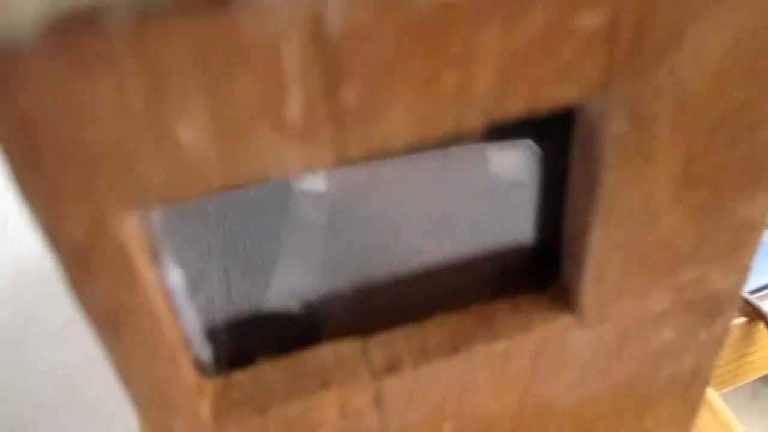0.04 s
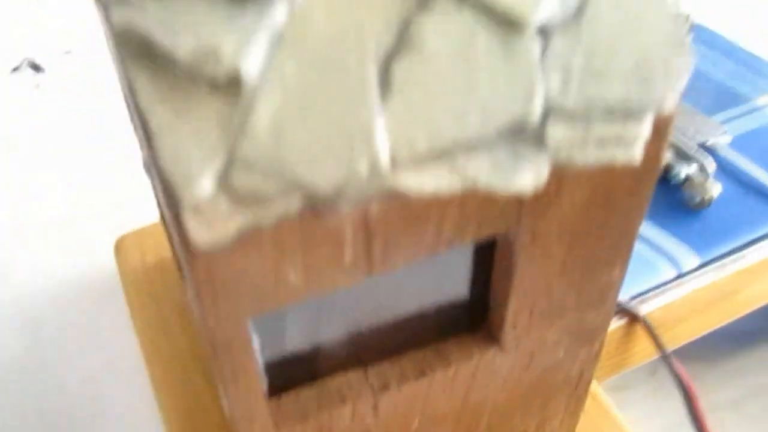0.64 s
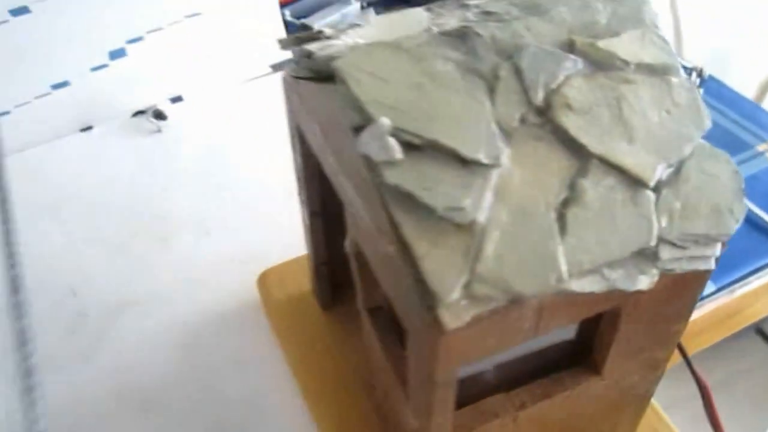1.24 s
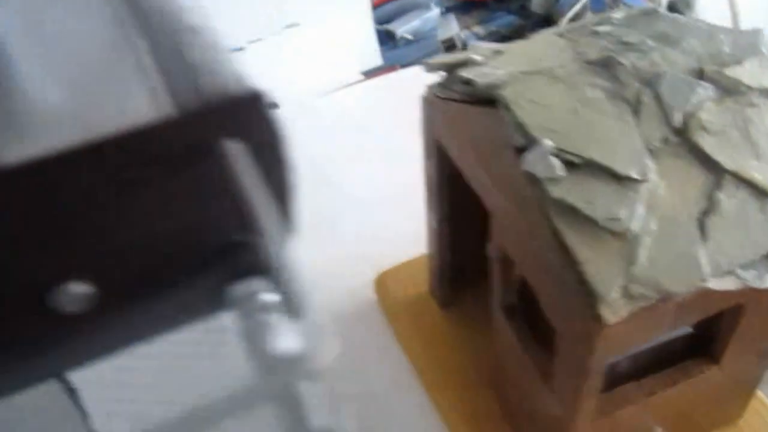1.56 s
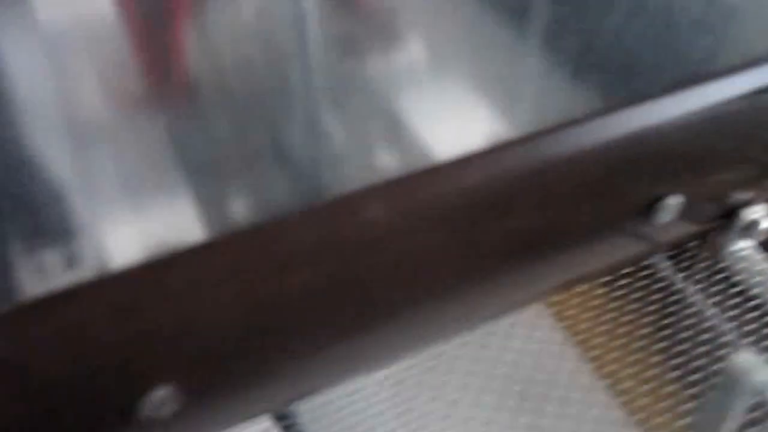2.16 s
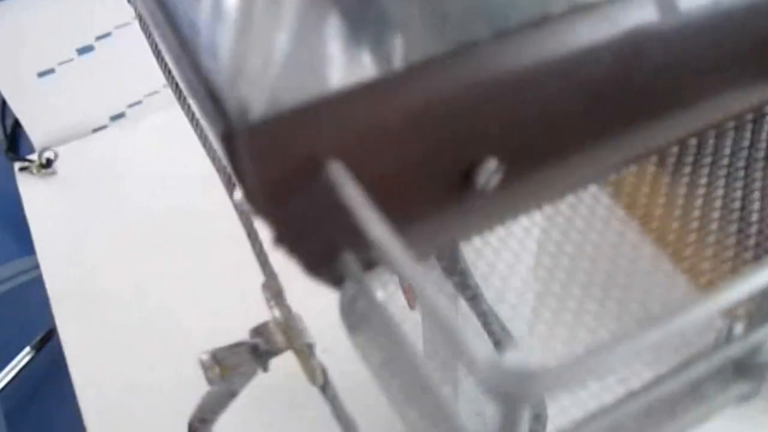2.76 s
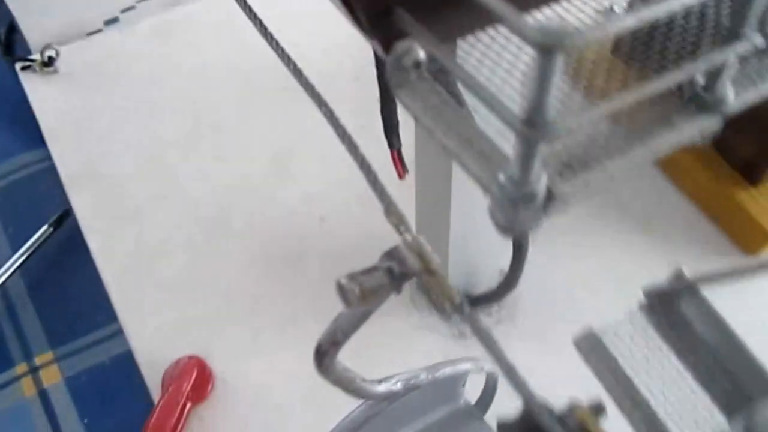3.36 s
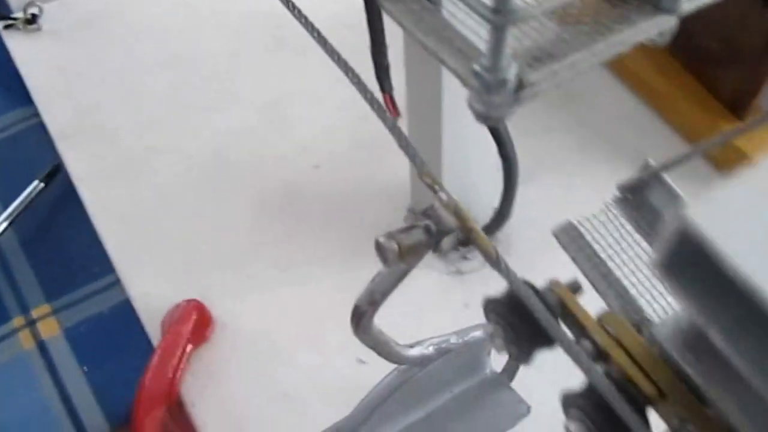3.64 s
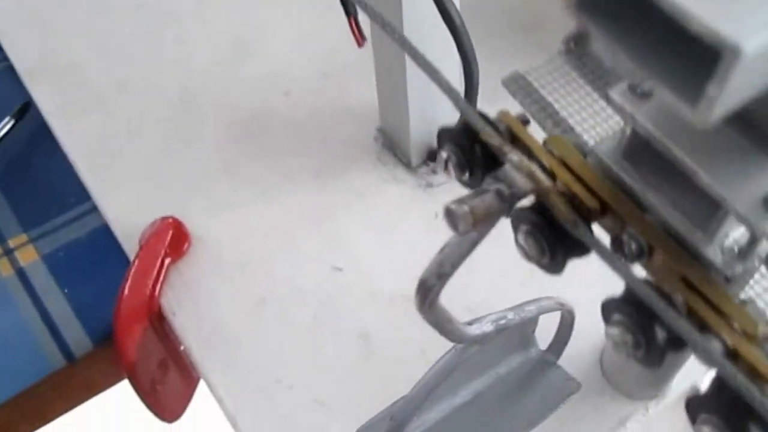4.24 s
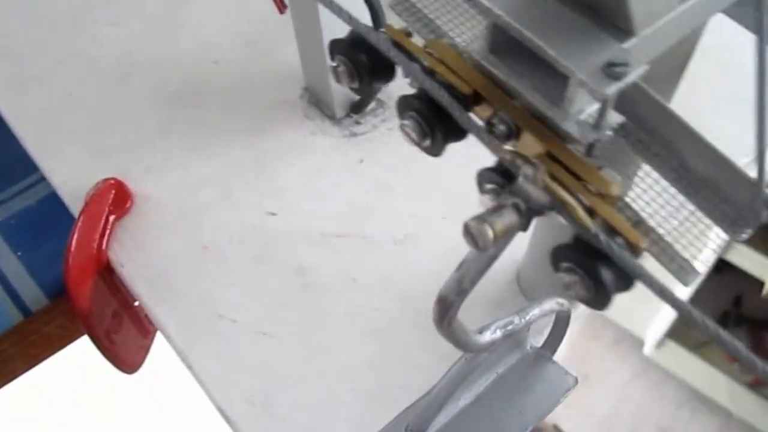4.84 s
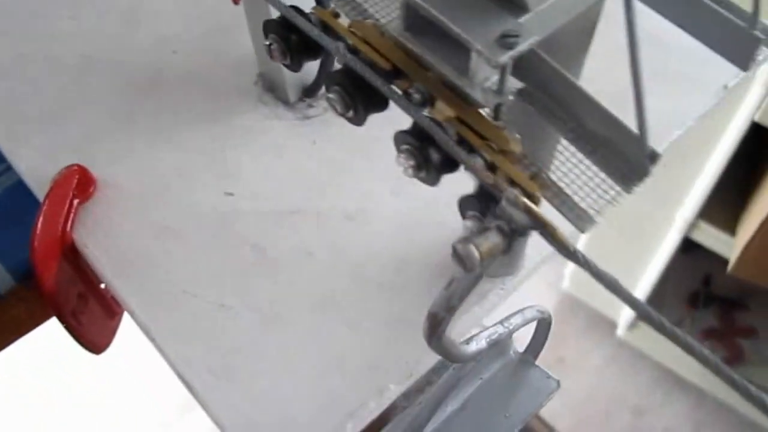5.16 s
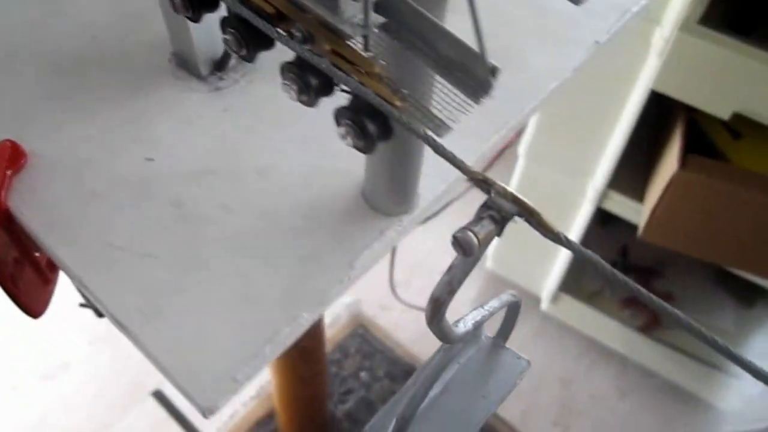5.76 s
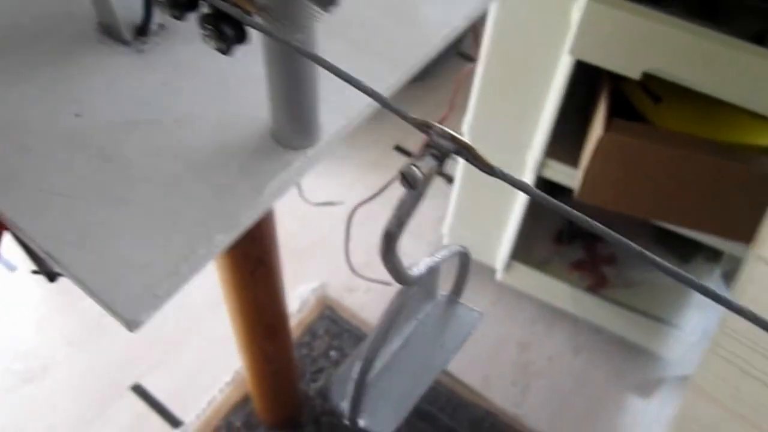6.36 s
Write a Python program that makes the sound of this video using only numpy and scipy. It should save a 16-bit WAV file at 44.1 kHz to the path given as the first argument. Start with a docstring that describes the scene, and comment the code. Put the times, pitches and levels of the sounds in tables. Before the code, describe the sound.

A small geared motor drives a model chairlift close by, whirring with a throbbing drone, a gear whine and a metallic rasp.

```python
"""At a table with a model chairlift, a hand-held microphone moving along it at close range.
A small geared motor drives the lift: its pinion turns a 50-tooth wheel whose worn teeth knock the
housing into a throbbing drone. The teeth whine and rasp, and a slower gear loads the drive four times
a second. Room rumble and mains hum lie underneath, with one soft bump about halfway through."""
import sys
import numpy as np
from scipy import signal
from scipy.fft import rfft, irfft
from scipy.io import wavfile
from scipy.ndimage import uniform_filter1d, map_coordinates

SR = 44100
rng = np.random.default_rng(int(sys.argv[2]) if len(sys.argv) > 2 else 0)


def output_pcm(signal):
    """Save a mono or channel-first signal as 16-bit PCM at the path in sys.argv[1].

    Samples are clipped to [-1, 1] before scaling.
    """
    pcm = np.clip(np.atleast_2d(signal).T, -1, 1) * 32767
    wavfile.write(sys.argv[1], SR, np.round(pcm).astype(np.int16))


N = 282681
T = np.arange(N) / SR
TEETH, PINION_TEETH = 50, 15
REDUCTION = 5  # wheel turns to one turn of the slow gear

# Room tone. Each row: frequency in Hz, relative level in dB.
RUMBLE_SPECTRUM = [(5, -18), (22, -5), (70, -3.5), (130, -2.5), (200, 2), (290, -3), (400, -5.5),
                   (900, -25), (4000, -45)]
# Hums of the mains and the drive. Each row: frequency in Hz, rms level in dB.
STEADY_HUMS = [(120, -56.5), (391.3, -51.5)]
# Pace of the wheel before the slow gear sways it. Each row: time in seconds, turns a second.
WHEEL_SPEED = [(0.0, 20.415), (1.1, 20.42), (2.0, 20.39), (2.35, 20.325), (3.1, 20.385), (4.9, 20.42),
               (6.41, 20.405)]
# Rings of the metal frame, each from its own part. Each row: frequency in Hz, width in Hz,
# boost from afar in dB, time in seconds when the microphone is nearest.
FRAME_RINGS = [(1790, 160, -4, 0.18), (2120, 41, -3, 0.2), (2410, 73, 3.5, 6.43), (2800, 150, 0, 1.1),
               (2910, 90, 0.5, 6.3), (3120, 120, 2, 0.82), (3480, 430, -2.5, 2.78), (4130, 140, 0, 1.52),
               (4600, 160, 0.5, 3.7), (5030, 72, -1.5, 3.7), (5360, 100, 2.5, 5.24),
               (5700, 380, -0.5, 2.22), (6200, 44, 3, 2.2), (6970, 140, 0, 0.3), (7160, 110, 2.5, 1.74),
               (7760, 160, 5, 4.13), (8260, 52, 7.5, 1.65), (9090, 170, 5.5, 2.44), (11120, 100, 4, 3.3),
               (14300, 200, 4.5, 2.7)]
# Basic colour of the rasp. Each row: frequency in Hz, relative level in dB.
RASP_SPECTRUM = [(250, -21), (450, -4), (800, 5), (1200, 2.5), (1550, 4.5), (1950, 0), (2900, 0),
                 (3550, -2.5), (5300, -3), (7100, -4), (7600, -11.5), (9700, -16), (11200, -11.5),
                 (15000, -14)]
# The rasp along the microphone's path: its lows, its middle and highs together, and its top fizz.
# Each row: time in seconds, relative level in dB.
RASP_LOW_PATH = [(0, -34.5), (1.2, -37), (2.1, -39), (3.6, -42), (4.5, -40), (6.41, -42)]
RASP_BODY_PATH = [(0, -28), (0.5, -29), (1.8, -29.5), (2.15, -28.5), (3.6, -29), (4.5, -30.5),
                  (6.41, -31.5)]
RASP_FIZZ_PATH = [(0, -49.5), (1.5, -53), (3.2, -45.8), (3.7, -48.5), (6.41, -51.5)]
# The strongest whines. Each row: multiple of the wheel speed, level from afar in dB, time in seconds
# when the microphone is nearest, rise there in dB, reach in seconds, standing-wave depth in dB
# (negative where the nearest point is a node).
WHINE_TONES = [(15, -61.5, 1.73, 6, 2.35, -6), (35, -42.5, 2.65, 12.5, 1.45, -2.3),
               (50, -44, 3.58, 4.5, 2.2, -4), (85, -56, 0.29, 13.5, 1, 3),
               (100, -52, 3.33, 10.5, 2.04, -1.5)]
# The drone, falling as the microphone leaves the housing. Each row: time in seconds, relative dB.
DRONE_PATH = [(0, -28.5), (0.8, -29.5), (2.5, -28), (3.8, -29), (5.3, -33), (6.0, -32.5), (6.41, -36)]
# Tight spots on the slow gear. Each row: place in its turn from 0 to 1, typical swell in dB.
TIGHT_SPOTS = [(.305, 2), (.55, 3), (.92, 1)]
# Worn spots on the wheel. Each row: place in its turn from 0 to 1, relative force in dB.
WORN_SPOTS = [(.0, -3), (.17, -1), (.545, -1), (.69, 0)]
# Resonances of the housing. Each row: frequency in Hz, width in Hz, relative gain in dB.
HOUSING_MODES = [(447, 27, 0), (553, 23, -10), (584, 27, 23.5), (651, 28, 17.5), (770, 27, -43),
                 (870, 16, -16), (920, 27, -22)]
# Steady tones of the drive. Each row: multiple of the wheel speed, relative level in dB.
DRONE_TONES = [(5, -64.9), (8, -64.4), (20, -54.8), (22, -55.8), (25, -46.5), (26, -52.5), (27, -41.2),
               (28, -47.3), (29, -40.1), (30, -44.8), (31, -54.9), (32, -54.3), (33, -42.3), (37, -44.4),
               (40, -50.4), (41, -53.4), (42, -51.2), (43, -48.5), (48, -54.9), (51, -52.0), (53, -53.4),
               (55, -49.0), (57, -54.6), (65, -49.0), (67, -54.8), (72, -53.7), (90, -56.0), (115, -51.0),
               (150, -48.2), (200, -52.7), (250, -52.0)]


def gain_of(db):
    """Decibels to amplitude."""
    return 10 ** (np.asarray(db) / 20)


def unit_rms(x):
    """Scales to an rms of 1."""
    return x / np.sqrt(np.mean(x ** 2) + 1e-20)


def at_times(rows, t):
    """A curve read at the times t."""
    return np.interp(t, *np.transpose(rows))


def at_frequencies(rows, hz):
    """A spectrum joined by straight lines over log frequency."""
    f, value = np.transpose(rows)
    return np.interp(np.log(hz + 1), np.log(f + 1), value)


def bell(x, centre, width):
    """A smooth hump of height 1."""
    return np.exp(-((x - centre) / width) ** 2)


def drift(rate_hz):
    """A slow random wander of rms 1."""
    lowpass = bell(np.fft.rfftfreq(N, 1 / SR), 0, rate_hz)
    return unit_rms(irfft(rfft(rng.standard_normal(N)) * lowpass, N))


def cycle(turns, peak_at=0):
    """Swings between -1 and 1 once a turn."""
    return np.cos(2 * np.pi * (turns - peak_at))


def bandpass(x, band_hz, order):
    """Keeps one band of a signal."""
    return signal.sosfilt(signal.butter(order, band_hz, "bandpass", fs=SR, output="sos"), x)


def room_tone(rumble_db=-53):
    """Behind everything: low rumble and the faint, steady hums of power supply and drive."""
    colour = gain_of(at_frequencies(RUMBLE_SPECTRUM, np.fft.rfftfreq(N, 1 / SR)))
    rumble = irfft(rfft(rng.standard_normal(N)) * colour, N)
    hum = sum(gain_of(db) * np.sqrt(2) * np.sin(2 * np.pi * hz * T) for hz, db in STEADY_HUMS)
    return gain_of(rumble_db) * unit_rms(rumble) + hum


def soft_bump(start_s=3.132, thud_db=-40, thud_t60=0.18, tick_db=-30, tick_t60=0.14):
    """One soft bump: a dull tick over a low thud that lasts a little longer."""
    age = np.maximum(T - start_s, 0)
    out = np.zeros(N)
    for band_hz, db, t60 in [([25, 300], thud_db, thud_t60), ([700, 1700], tick_db, tick_t60)]:
        noise = bandpass(rng.standard_normal(N), band_hz, order=2)
        out += unit_rms(noise) * gain_of(db - 60 * age / t60)
    return out * (T > start_s)


def table_echoes(x, wet=0.66, t60=0.097, positions=16, echoes_per_s=4000):
    """Table and frame add a short cluster of echoes, which changes as the microphone moves."""
    t = T[:SR // 8]
    echoes = np.zeros(N)
    for nearness in np.eye(positions):
        taps = rng.standard_normal(len(t)) * (rng.random(len(t)) < echoes_per_s / SR)
        taps *= gain_of(-60 * t / t60)
        crossfade = np.sqrt(np.interp(T, np.linspace(0, T[-1], positions), nearness))
        echoes += crossfade * signal.oaconvolve(x, taps / np.linalg.norm(taps))[:N]
    return x + wet * echoes


def frame_rings_db(f, t, pass_db=8, reach_s=0.53, widen=1.09):
    """The frame's rings: each grows and broadens as the microphone passes its part."""
    return sum(db * bell(f, hz, width) + pass_db * bell(t, near_s, reach_s) * bell(f, hz, widen * width)
               for hz, width, db, near_s in FRAME_RINGS)


def tooth_pressure(turns, mesh_db=3.5, pinion_db=-0.74, oval_db=1.2, tooth_softening_db=-0.3):
    """Pressure between the teeth rises with every tooth and twice a wheel turn."""
    # a quick rise, then a slow release
    grab = sum(np.sin(2 * np.pi * k * (2 * turns - 0.87)) / k for k in range(1, 7))
    db = mesh_db * cycle(TEETH * turns) + pinion_db * cycle(PINION_TEETH * turns) + oval_db * grab
    # each tooth presses a little more softly, by a random amount
    tooth = (turns * TEETH).astype(int)
    db += tooth_softening_db * np.minimum(rng.exponential(1, N), 5)[tooth]
    return unit_rms(gain_of(db))


def rasp_shading_db(spectrum, hz, t):
    """Each register of the rasp is shaded differently as the microphone moves round the station."""
    bands_hz = [(1080, 1950), (2100, 4300), (4300, 7500), (8500, 15000)]
    body_db = at_times(RASP_BODY_PATH, t) - 3.5
    targets_db = [at_times(RASP_LOW_PATH, t) - 0.8, body_db, body_db, at_times(RASP_FIZZ_PATH, t) - 1]
    shade_db = 0
    for weights, (low, high), target_db in zip(np.eye(len(bands_hz)), bands_hz, targets_db):
        power = np.sum(abs(spectrum[(hz > low) & (hz < high)]) ** 2, axis=0)
        smooth_db = 10 * np.log10(uniform_filter1d(power, size=85) * 4 / 3)
        blend = np.interp(hz[:, None], np.mean(bands_hz, axis=1), weights)
        shade_db += blend * (target_db - smooth_db)
    return shade_db


def tooth_rasp(turns, load_db=1.24, coarse_share=0.56, coarse_below_hz=4000, size=1024):
    """Tooth flanks scrape: their coarse roughness comes round every turn, the fine grit is always new."""
    flank = unit_rms(irfft(np.exp(2j * np.pi * rng.random(size + 1))))
    roughness = map_coordinates(flank, [turns % 1 * len(flank)], mode="grid-wrap")
    pressure = tooth_pressure(turns)
    scrapes = [table_echoes(x * pressure) for x in (roughness, rng.standard_normal(N))]
    windows = dict(nperseg=size, noverlap=size * 3 // 4)
    hz, t, (coarse, grit) = signal.stft(scrapes, SR, **windows)
    f = hz[:, None]
    share = coarse_share / (1 + (f / coarse_below_hz) ** 2)
    spectrum = np.sqrt(share) * coarse + np.sqrt(1 - share) * grit
    spectrum *= gain_of(at_frequencies(RASP_SPECTRUM, f) + frame_rings_db(f, t))
    # the slow gear's load brightens the scrape once in each of its turns
    bright_db = load_db * np.sqrt(f / 8000) * cycle(np.interp(t, T, turns) / REDUCTION, peak_at=0.72)
    spectrum *= gain_of(rasp_shading_db(spectrum, hz, t) + bright_db)
    return signal.istft(spectrum, **windows)[1][:N]


def whines(turns, waver=0.17, waver_hz=10, crest_to_crest_s=2.7):
    """Teeth and commutator sing; each tone swells as the microphone nears it through standing waves."""
    out = np.zeros(N)
    for order, far_db, near_s, rise_db, reach_s, standing_db in WHINE_TONES:
        crests = cycle((T - near_s) / crest_to_crest_s)
        near_db = bell(T, near_s, reach_s) * (rise_db + standing_db * crests)
        angle = 2 * np.pi * round(order) * turns
        tone = (1 + waver * drift(waver_hz)) * np.cos(angle)
        tone += waver * drift(waver_hz) * np.sin(angle)  # the phase wavers too
        out += gain_of(far_db + near_db) * np.sqrt(2) * tone
    return out


def wheel_turns(sag_turns_per_s=0.045):
    """Turns of the wheel so far; the slow gear runs off centre, so the speed sags once a slow turn."""
    speed = at_times(WHEEL_SPEED, T)
    slow_turns = np.cumsum(speed) / SR / REDUCTION
    return np.cumsum(speed + sag_turns_per_s * cycle(slow_turns, peak_at=0.372)) / SR


def housing_swell(turns, between_db=-1.48, spot_turns=0.045, grip_spread=0.35):
    """Louder close to the housing, chugging at the tight spots, whose grip varies from turn to turn."""
    lap, angle = np.divmod(turns / REDUCTION, 1)
    grips = 1 + grip_spread * rng.standard_normal((int(lap[-1]) + 1, len(TIGHT_SPOTS)))
    chug_db = sum(db * grip * bell(angle, place, spot_turns)
                  for (place, db), grip in zip(TIGHT_SPOTS, grips[lap.astype(int)].T))
    return unit_rms(gain_of(at_times(DRONE_PATH, T))) * gain_of(chug_db + between_db)


def housing_knocks(turns, swell, gain_db=-31, chatter=0.043, slip_chance=0.12):
    """Loose teeth hit one flank or the other, mostly as the slow gear leads them; the housing rings."""
    blows = chatter * rng.standard_normal(N)
    for place, force_db in WORN_SPOTS:
        lap = np.floor(turns - place + 0.05).astype(int)
        strikes = np.diff(lap, prepend=lap[0]) > 0
        flank = rng.choice([-1, 1], REDUCTION)[lap % REDUCTION]
        flank *= np.where(rng.random(N) < slip_chance, -1, 1)
        blows += strikes * gain_of(force_db) * flank
    ring = np.zeros(N)
    for hz, width, db in HOUSING_MODES:
        decay = np.exp(-np.pi * width / SR)
        pole = decay * np.exp(2j * np.pi * hz / SR)
        ring += gain_of(db) * signal.lfilter([1 - decay], [1, -pole], blows).real
    ring = bandpass(ring, [440, 830], order=4)  # the small housing radiates only a narrow band
    # the play between the teeth bounds how far the rattle can build up
    bound = (uniform_filter1d(unit_rms(ring) ** 2, size=600) + 0.1) ** 0.32
    return gain_of(gain_db) * unit_rms(ring / bound) * swell


def gear_drone(turns, swell, gain_db=0.6):
    """The worn spots strike in the same rhythm each turn: a stack of harmonics that bunch into beats."""
    place, force_db = np.transpose(WORN_SPOTS)
    out = np.zeros(N)
    for order, db in DRONE_TONES:
        strike = np.sum(gain_of(force_db) * np.exp(-2j * np.pi * order * place))
        out += gain_of(db) * np.cos(2 * np.pi * order * turns + np.angle(strike))
    return np.sqrt(2) * gain_of(gain_db) * out * swell


def scene():
    """The drive up close, all following one wheel, over the room; one microphone feeds both channels."""
    turns = wheel_turns()
    swell = housing_swell(turns)
    drive = gear_drone(turns, swell) + housing_knocks(turns, swell) + whines(turns) + tooth_rasp(turns)
    mix = drive + room_tone() + soft_bump()
    return np.array([mix, mix])


def record(dry, edge_hz=15250):
    """The recorder cuts off the highest treble."""
    lowpass = signal.firwin(801, edge_hz, window=("kaiser", 9), fs=SR)
    return signal.oaconvolve(dry, lowpass[None], "same")


dry = scene()
out = record(dry)
output_pcm(out)
```